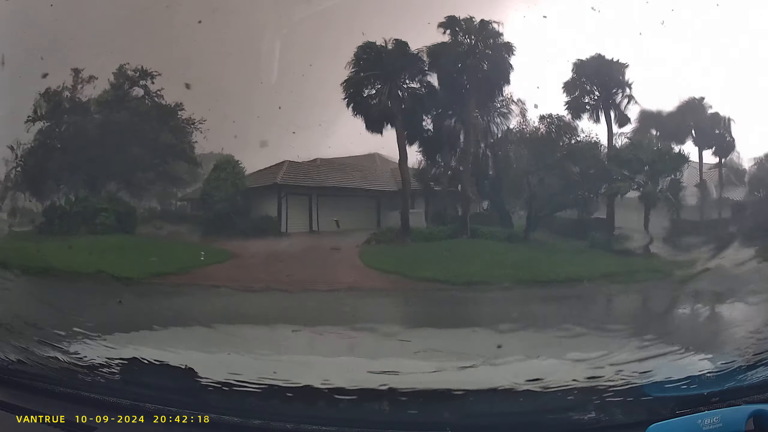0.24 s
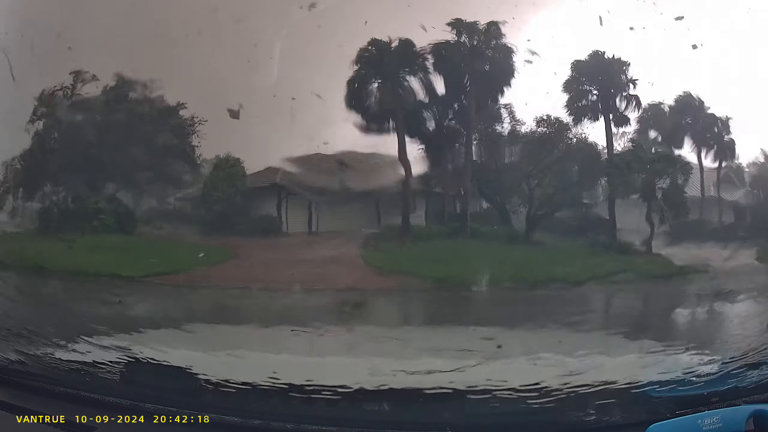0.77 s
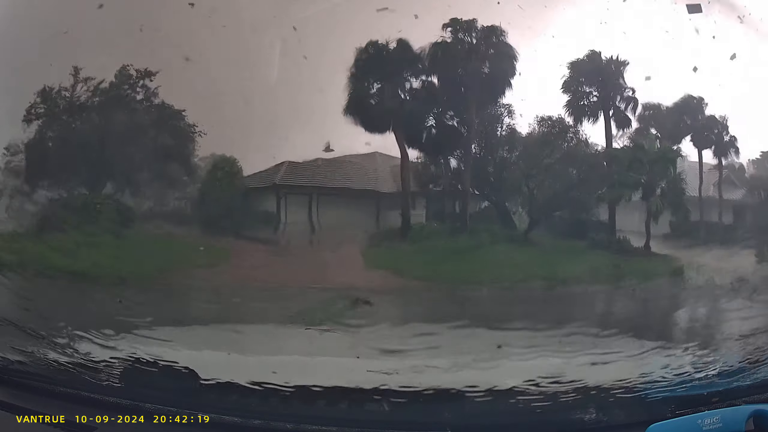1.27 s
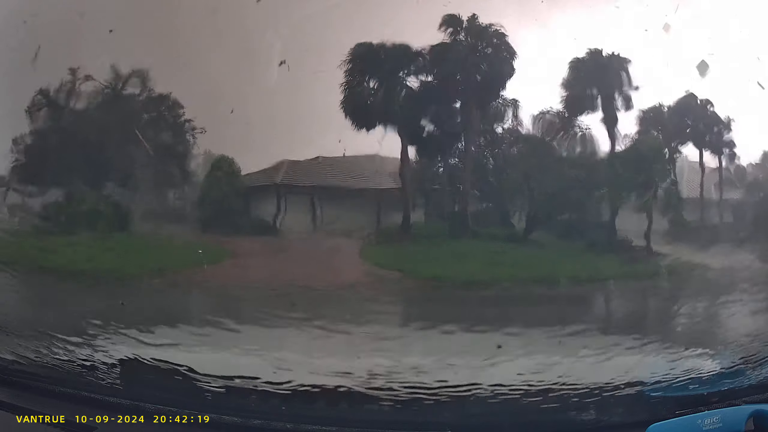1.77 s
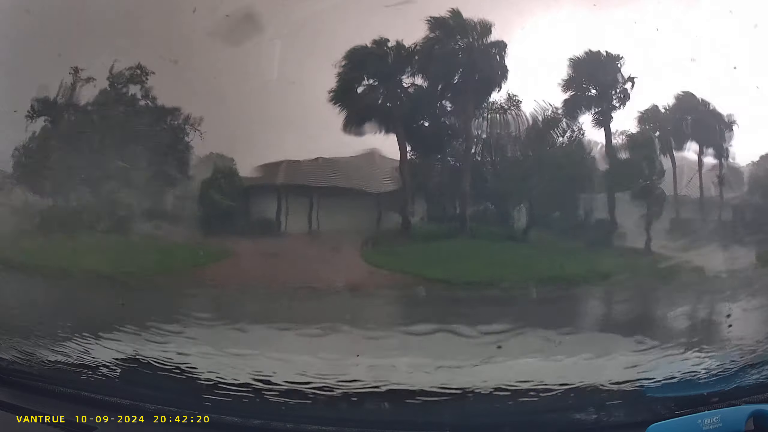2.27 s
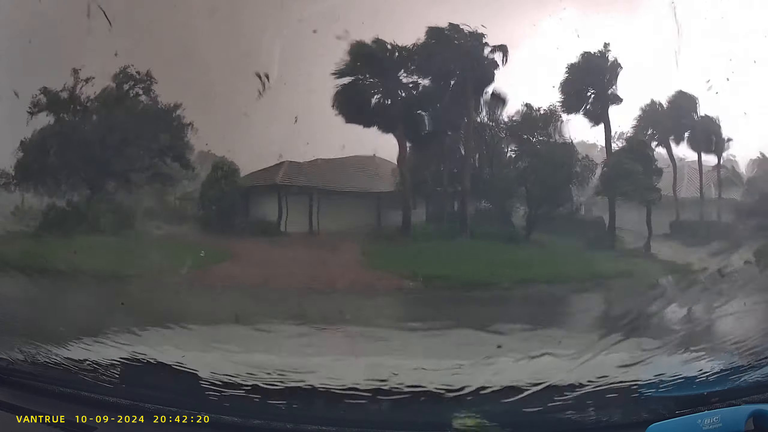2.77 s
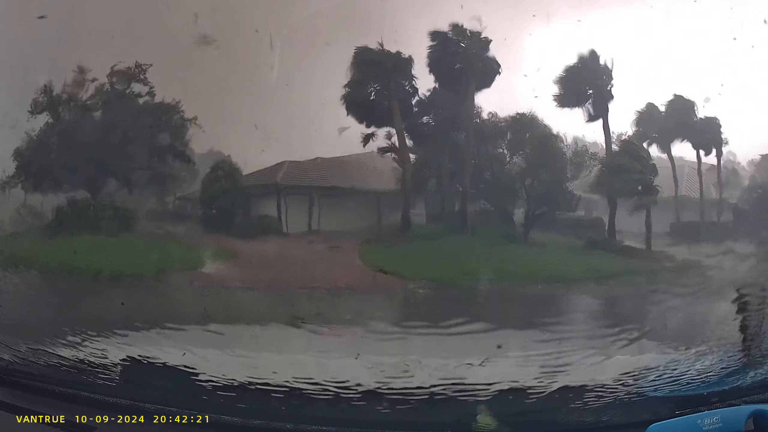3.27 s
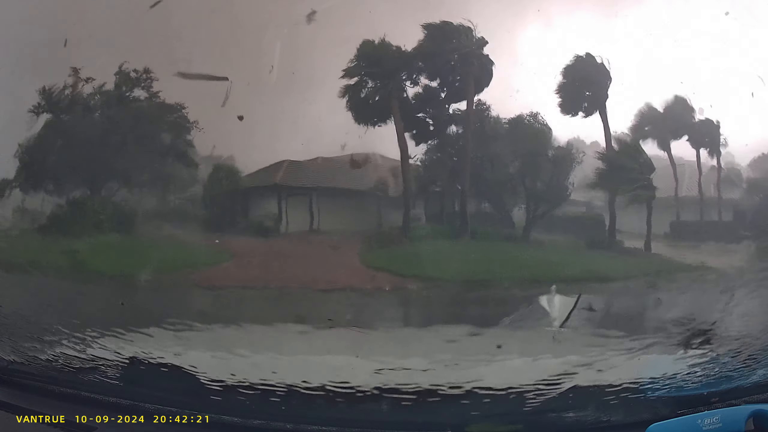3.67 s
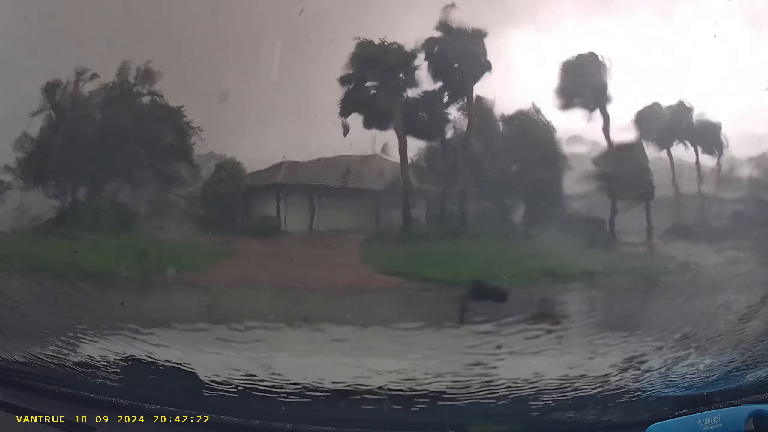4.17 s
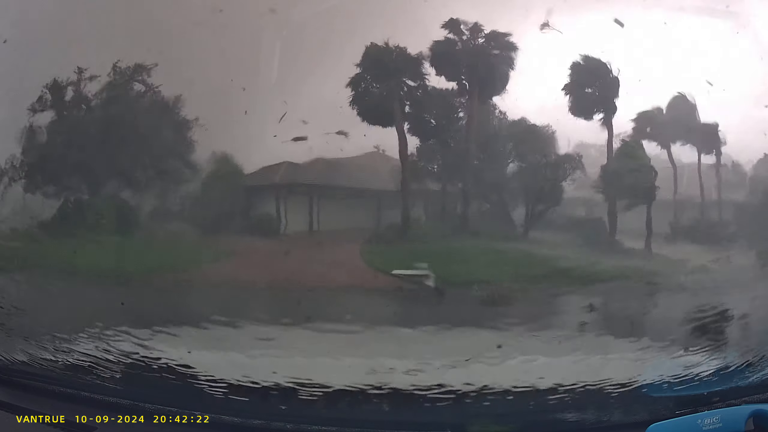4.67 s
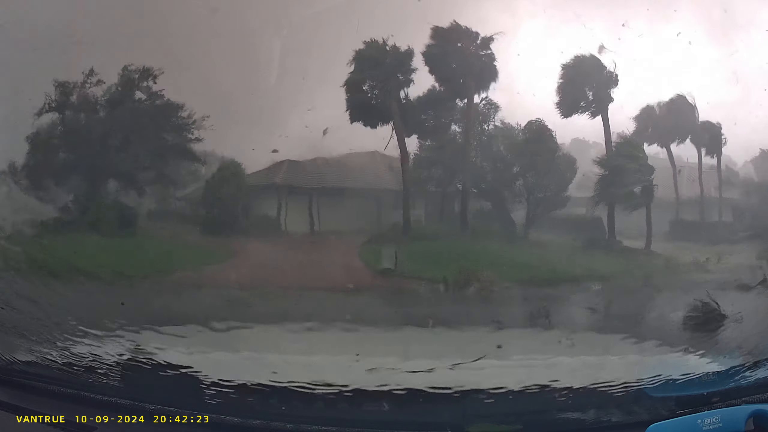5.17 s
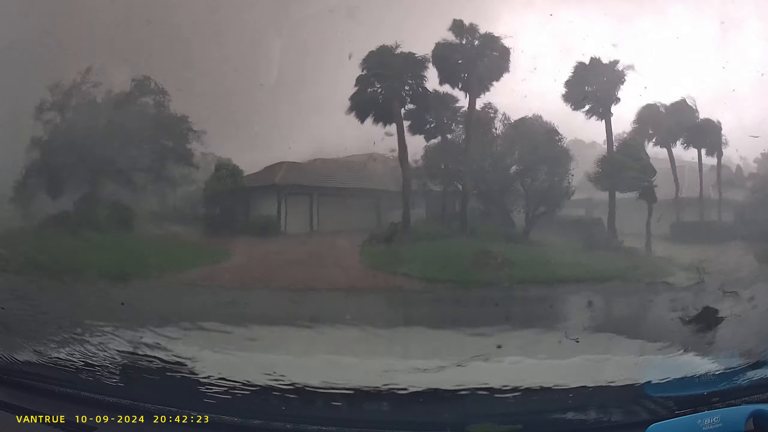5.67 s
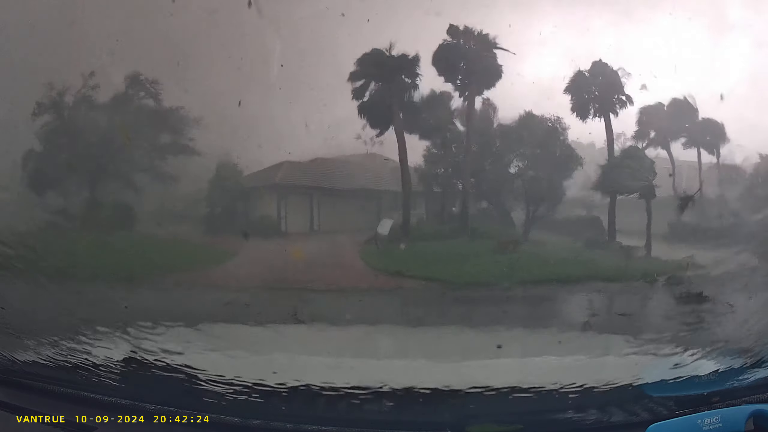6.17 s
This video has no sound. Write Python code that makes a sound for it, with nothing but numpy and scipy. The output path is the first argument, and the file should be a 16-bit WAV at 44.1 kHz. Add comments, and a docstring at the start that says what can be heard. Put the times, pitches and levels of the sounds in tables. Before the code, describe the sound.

Inside a parked car in a tornado, one channel, close and boxy. Low wind roar and sub-bass shaking run throughout, with faint rain hiss, patter and fine spray. For the first second it is relatively quiet: small ticks, a sharper click at 0.76, a water sheet at 0.8 and a dull knock at 0.95. From 1.2 heavy debris bangs the body panels; wind surges at 1.4, and hits crowd from 1.8 to 2.5 with big thuds, a gust and a sheet drumming on the roof. At 2.74 comes the loudest, hard glassy crack. A leafy rasp drags over paint at 3.0-3.25. Knocks resume at 3.5, bright clicks cluster at 3.8-4.6, with a thump at 4.14. Then sparser ticks, a solid knock at 5.2, lighter ones after, a gust at 5.7, and a click at 5.95 as rain and deeper roar swell near 6.0, easing slightly by 6.4.

```python
"""Tornado wind buffets a parked car and roars round it, heard from the cabin: drifting coloured noise.
Rain adds noise for sheets on the roof, random taps on the glass and a whisper of fine spray.
Short noise bursts make sharp clicks: grit and twigs, and a few overload ticks of the microphone.
Heavy debris rings the panels as decaying sines with bursts; a frond rasps by stick and slip.
All pass through shell resonances, and a fast limiter holds down the hardest blows."""
import sys
import numpy as np
from scipy import signal
from scipy.io import wavfile
from scipy.ndimage import uniform_filter1d, minimum_filter1d

SR = 44100
rng = np.random.default_rng(int(sys.argv[2]) if len(sys.argv) > 2 else 0)


def int16_out(signal):
    """Quantize to a 16-bit WAV file."""
    q = np.round(np.clip(np.atleast_2d(signal).T, -1, 1) * 32767)
    wavfile.write(sys.argv[1], SR, q.astype(np.int16))


N = 283563  # samples

# Spectral shapes before the shell resonances: f/Hz, relative density/dB
# dull colour of a struck or scraped body panel
BODY_SPECTRUM = [(50, -49.5), (140, 3), (240, 5), (380, 6), (580, -3.5), (850, -12.5), (2000, -50),
                 (5000, -73.5)]
# clack in the knocks and the sharp clicks
CLACK_SPECTRUM = [(150, -51.5), (450, 5), (750, 7), (1150, 2.5), (1500, -3), (2100, -13.5), (4000, -33),
                  (10000, -75.5)]
# sizzle of fine spray and of the sharp clicks
SIZZLE_SPECTRUM = [(2500, -30.5), (6500, 6.5), (9000, -3.5), (11000, -10.5), (13500, -17.5), (16000, -34)]
# sheets of water flung on the roof: start t/s, length/s, crest level/dB
WATER_SHEETS = [(0.81, 0.25, -35), (1.61, 0.15, -33), (2.12, 0.38, -28.5), (2.56, 0.15, -35.5),
                (3.85, 0.17, -32.5), (5.3, 0.35, -39.5), (5.98, 0.25, -39.5)]


def amp(db):
    """Level to gain: 20 dB is a factor of ten in amplitude."""
    return 10 ** (np.asarray(db) / 20)


def evened(x):
    """Normalization to unit rms, so that a later gain alone sets the level."""
    return x / np.sqrt(np.mean(x ** 2) + 1e-20)


def add(mix, s, sound):
    """Linear superposition of a sound on the mix, starting at s seconds."""
    part = mix[round(s * SR):][:len(sound)]
    part += sound[:len(part)]


def colour_db(spectrum, hz):
    """Transmission through a resonant shell: each mode lifts or lowers the source spectrum near its centre."""
    # resonances of panels and cabin: f/Hz, width/Hz, lift/dB
    shell_modes = [(127, 79, 2.5), (328, 70, 3), (544, 21, 3.5), (814.4, 28, 6), (1080, 290, 4.5),
                   (1960, 580, 5.5), (3060, 150, 0), (3670, 140, -3), (4150, 260, 2), (5000, 150, 1),
                   (6270, 1070, -8.5), (8330, 640, -6)]
    f, db = np.transpose(spectrum)
    source_db = np.interp(np.log(hz + 1), np.log(f), db)
    lifts = sum(lift / (1 + (2 * (hz - centre) / width) ** 2) for centre, width, lift in shell_modes)
    return source_db + lifts


def response(spectrum, size=4096):
    """Minimum-phase impulse response: the Hilbert transform of log gain gives the causal phase."""
    log_gain = np.log(amp(colour_db(spectrum, abs(np.fft.fftfreq(size, 1 / SR)))))
    causal_spectrum = np.exp(np.conj(signal.hilbert(log_gain)))
    return np.fft.ifft(causal_spectrum).real[:size // 2]


def turbulence(spectrum, patchy_db, flutter_db):
    """Turbulent noise: level patches (rms dB) drift over time and frequency; all bands share a flutter."""
    hz = np.fft.rfftfreq(2048, 1 / SR)
    real, imag, patches = rng.standard_normal((3, N // 512 + 5, len(hz)))
    patches = uniform_filter1d(patches, size=7, axis=0)  # over frames of 512 samples
    patches = evened(uniform_filter1d(patches, size=18, axis=1))  # over frequency bins
    frames = (real + 1j * imag) * amp(colour_db(spectrum, hz) + patchy_db * patches)
    noise = signal.istft(frames.T, nperseg=2048, noverlap=1536)[1][:N]
    flutter = uniform_filter1d(rng.standard_normal(N), size=900)
    flutter = evened(uniform_filter1d(flutter, size=400))
    return evened(noise * amp(flutter_db * flutter))


def burst(colour, t60, rise, tail_db, tail_t60, grain=0.):
    """Diffuse impulse: noise swells, decays exponentially and leaves a faint longer tail; times in s."""
    t = np.arange(SR // 2) / SR
    decay = amp(-60 * t / t60) + amp(tail_db - 60 * t / tail_t60)
    shape = (1 - np.exp(-t / rise)) * decay
    # the burst chatters: its level jumps by about `grain` dB every 64 samples
    chatter = np.repeat(rng.standard_normal(len(t)), 64)[:len(t)]
    source = rng.standard_normal(len(t)) * shape * amp(grain * chatter)
    sound = signal.fftconvolve(source, colour)[:len(t)]
    return sound / np.sqrt(np.sum(sound ** 2) / (0.014 * SR))  # energy of 14 ms at unit rms


def weather():
    """Slow forcing: wind and rain strength in dB, interpolated to every sample."""
    # strength of the storm: t/s, wind level/dB, rain level/dB
    storm = [(0.0, -35, -62), (1.25, -36, -61), (1.4, -23, -55.5), (1.66, -32, -59.5), (1.88, -27, -61.5),
             (2.11, -23.5, -51), (2.31, -30, -48), (2.74, -34, -62.5), (3.01, -31, -66), (3.17, -26.5, -57),
             (3.74, -32, -51.5), (4.05, -26, -52), (4.19, -30.5, -55), (5.68, -30, -54.5),
             (6.0, -25.5, -47), (6.43, -26, -57)]
    times, wind_db, rain_db = np.transpose(storm)
    t = np.arange(N) / SR
    return np.interp(t, times, wind_db), np.interp(t, times, rain_db)


def blown(db, growth):
    """Power-law growth with wind: level db at the usual wind, plus growth dB per dB of wind."""
    usual_wind_db = -30
    wind_db, _ = weather()
    return amp(db + growth * (wind_db - usual_wind_db))


def surges(rows):
    """Transient forcing: the gain of each gust or sheet swells to a crest and eases off."""
    t, gain = np.arange(N) / SR, np.zeros(N)
    crest = 0.32  # share of the length
    for s, length, db in rows:
        swell = np.interp((t - s) / length, [0, crest, 1], [0, 1, 0])
        gain += amp(db) * np.sin(np.pi / 2 * swell)
    return gain


def wind():
    """Turbulent pressure shakes and roars round the car; gusts add power to shaking, water sheets to roar."""
    # low shaking: f/Hz, relative density/dB
    buffet_spectrum = [(10, -14), (25, -16), (45, 2.5), (85, 9.5), (120, -32.5), (200, -35.5), (500, -66)]
    # broader roar: f/Hz, relative density/dB
    roar_spectrum = [(40, -12.5), (90, -14.5), (135, 1), (200, 2), (330, -3.5), (450, -8.5), (650, -30),
                     (1500, -62), (4000, -96)]
    # gusts that rock the car: start t/s, length/s, crest level/dB
    gusts = [(0.55, 0.53, -37.5), (1.88, 0.94, -28), (3.38, 0.18, -29.5), (3.65, 0.49, -35),
             (4.45, 0.27, -32), (5.69, 0.2, -27), (5.88, 0.43, -38)]
    sheet_roar_db = 8  # the roof booms under each sheet
    shaking = np.hypot(blown(-41, growth=0.29), surges(gusts))
    roaring = np.hypot(blown(-29.5, growth=0.93), amp(sheet_roar_db) * surges(WATER_SHEETS))
    buffet = shaking * turbulence(buffet_spectrum, patchy_db=1.8, flutter_db=0.2)
    roar = roaring * turbulence(roar_spectrum, patchy_db=2.32, flutter_db=0.7)

    # the roar deepens as the storm closes in: the tilt raises its bass and lowers the rest
    crossover_hz, start_tilt_db, tilt_db_per_s = 200, -1.5, 0.6
    deep = signal.sosfiltfilt(signal.butter(2, crossover_hz, fs=SR, output="sos"), roar)
    tilt = amp(start_tilt_db + tilt_db_per_s * np.arange(N) / SR)
    return buffet + deep * tilt + (roar - deep) / tilt


def rain():
    """Many impacts merge into noise: sheets drum on the roof, random single drops patter through a hiss."""
    # drumming on the roof: f/Hz, relative density/dB
    spray_spectrum = [(150, -25), (380, -5), (600, 8.5), (800, -3), (1150, -3), (1500, -14.5), (2100, -21),
                      (4000, -29.5), (9000, -77.5)]
    # hiss and taps on the glass: f/Hz, relative density/dB
    hiss_spectrum = [(500, -22.5), (1400, 4), (2200, -4), (3200, 2.5), (4600, -0.5), (5600, -7),
                     (7500, -13), (9500, -20), (13000, -25), (16000, -25)]
    drops_per_s, spread_db, drops_db = 320, 3.5, -1.5  # drops_db: patter relative to hiss
    drumming = np.hypot(blown(-41.5, growth=0.73), surges(WATER_SHEETS))
    spray = drumming * turbulence(spray_spectrum, patchy_db=2.1, flutter_db=2.5)
    hiss = turbulence(hiss_spectrum, patchy_db=4.5, flutter_db=6.0)

    sizes = amp(spread_db * np.minimum(rng.exponential(1, N), 4)) * rng.choice([-1, 1], N)
    impacts = sizes * (rng.random(N) < drops_per_s / SR)
    spot = rng.integers(0, 8, N)
    colour, patter = response(hiss_spectrum), np.zeros(N)
    for k in range(8):  # each spot on the glass has its own tap
        tap = burst(colour, t60=0.18, rise=0.0003, tail_db=-29, tail_t60=0.12)
        patter += signal.oaconvolve(impacts * (spot == k), tap)[:N]
    _, rain_db = weather()
    return spray + amp(rain_db) * (hiss + amp(drops_db) * evened(patter))


def fizz():
    """Tiny impacts of fine spray fuse into a high whisper on the windscreen, growing with the rain."""
    usual_rain_db, usual_db, growth = -52.5, -71, 0.8  # growth in dB per dB of rain
    _, rain_db = weather()
    gain = amp(usual_db + growth * (rain_db - usual_rain_db))
    return gain * turbulence(SIZZLE_SPECTRUM, patchy_db=2.5, flutter_db=1.5)


def clicks():
    """A short impulse is broadband: grit, twigs and a few overload ticks, each with its own snap resonance."""
    # sharp clicks: grit and twigs, and a few overload ticks of the microphone:
    # t/s, relative snap/dB, snap f/Hz, relative clack/dB, relative sizzle/dB, nominal t60/s
    sharp_clicks = [(0.102, -46.5, 2900, -49, -67, 0.12), (0.4467, -45, 3060, -34, -75, 0.14),
                    (0.5062, -36, 3330, -21.5, -60, 0.11), (0.755, -41, 3000, -31, -52, 0.15),
                    (0.7628, -18, 2950, -13, -32, 0.11), (0.83, -29.5, 5460, -19, -44, 0.16),
                    (1.3671, -29, 2680, -15, -70, 0.12), (1.4628, -21, 2680, -15.5, -45.5, 0.13),
                    (1.8623, -33, 2390, -15, -48.5, 0.027), (1.9331, -18, 3740, -10, -37, 0.066),
                    (2.104, -38.5, 3300, -41, -53, 0.087), (2.241, -23, 2370, -10.5, -43, 0.092),
                    (2.4327, -27, 4150, -17.5, -50, 0.089), (2.621, -18.5, 2700, -18.5, -47, 0.095),
                    (2.693, -38, 3350, -22.5, -66, 0.076), (2.7392, 0, 3030, -5.5, -22, 0.084),
                    (2.8734, -48, 2440, -26, -73, 0.028), (3.4047, -38, 4460, -21.5, -75, 0.11),
                    (3.455, -28.5, 4400, -39, -36.5, 0.13), (3.4843, -21.5, 4850, -9.5, -40, 0.077),
                    (3.6601, -39, 3250, -19.5, -80, 0.27), (3.8204, -11.5, 4580, -13, -34.5, 0.098),
                    (3.862, -17, 3250, -16, -33.5, 0.13), (3.938, -26.5, 2630, -22, -54, 0.15),
                    (3.9712, -21.5, 3160, -20, -50, 0.13), (4.016, -24.5, 2640, -23.5, -57, 0.1),
                    (4.109, -37, 3100, -19.5, -73, 0.11), (4.127, -16.5, 3800, -19, -34.5, 0.14),
                    (4.179, -30, 3320, -15.5, -36, 0.12), (4.359, -35, 4330, -28.5, -49.5, 0.14),
                    (4.4397, -23, 2750, -26, -44.5, 0.14), (4.499, -21, 2930, -22, -44.5, 0.22),
                    (4.5591, -30, 3400, -29, -43.5, 0.16), (4.601, -34.5, 4270, -38, -65, 0.098),
                    (4.781, -32, 3080, -28.5, -61, 0.12), (4.9627, -39, 4430, -20.5, -52, 0.051),
                    (5.017, -22, 4330, -47, -35, 0.095), (5.0468, -23.5, 2980, -27, -46, 0.14),
                    (5.3337, -35.5, 2940, -23, -67, 0.041), (5.835, -52, 4400, -46, -50.5, 0.26),
                    (5.9514, -17.5, 2960, -22.5, -41.5, 0.13), (6.035, -30.5, 2920, -26, -74, 0.16),
                    (6.175, -37.5, 4590, -34, -54, 0.24), (6.4164, -34.5, 4760, -34, -50, 0.12)]
    # glassy snap: f/Hz, relative density/dB
    glass_spectrum = [(500, -16), (1400, -5.5), (2500, 2), (3500, 3), (5000, 3.5), (7000, -7), (9000, -28),
                      (15000, -47)]
    width_hz, snap, rise, usual_t60 = 500, 1.57, 0.0016, 0.16  # snap: gain of the resonance; times in s
    out = np.zeros(N)
    glass, clack, sizzle = map(response, (glass_spectrum, CLACK_SPECTRUM, SIZZLE_SPECTRUM))
    for s, snap_db, hz, clack_db, sizzle_db, t60 in sharp_clicks:
        onset = rise * (t60 / usual_t60) ** 2  # clicks that die fastest also start fastest
        resonator = signal.iirpeak(hz, hz / width_hz, fs=SR)
        tuned = glass + snap * signal.lfilter(*resonator, glass)
        click = amp(snap_db - 8.5) * burst(
            tuned, t60 * 0.93, onset, tail_db=-22.5, tail_t60=0.17, grain=0.84)
        click += amp(clack_db - 10) * burst(
            clack, t60 * 1.12, onset, tail_db=-29, tail_t60=0.2, grain=3.2)
        click += amp(sizzle_db - 1) * burst(
            sizzle, t60 * 0.77, onset * 0.72, tail_db=-31.5, tail_t60=0.2, grain=2.2)
        add(out, s, click)
    return out


def panel_ring(hz, t60, rise):
    """Damped modal vibration: a struck panel mode swells, then dies exponentially; times in s."""
    t = np.arange(SR // 2) / SR
    ring = (1 - np.exp(-t / rise)) * amp(-60 * t / t60) * np.sin(2 * np.pi * hz * t)
    return ring / np.sqrt(np.sum(ring ** 2) / (0.017 * SR))  # energy of 17 ms at unit rms


def knocks():
    """Modal impact: weight drives low mode and body, hardness high mode and clack; some crack or thud."""
    # debris on the body: t/s, relative weight/dB, hardness/dB, crack/dB, thud/dB,
    # low ring f/Hz, high ring f/Hz, nominal t60/s
    debris_hits = [(0.949, -9, -28, -55, -30, 148, 577, 0.067), (1.208, 1, -10, -28.5, -18, 187, 550, 0.16),
                   (1.302, -7, -17.5, -38, -34, 139, 545, 0.13),
                   (1.367, -30, -11, -44, -46, 288, 1114, 0.14),
                   (1.411, -6.5, -18.5, -30, -20, 229, 593, 0.19),
                   (1.509, -7.5, -29, -36, -35, 312.2, 535, 0.47),
                   (1.828, 3, -9.5, -29.5, -26, 305, 465, 0.077),
                   (1.863, -3, -19, -36, -29, 339, 486, 0.099),
                   (1.972, -2, -16, -31.5, -11, 329, 567, 0.091), (2.1, -5, -29, -43, -24, 320, 544, 0.076),
                   (2.221, -2.5, -11, -21, -0.5, 146, 605, 0.046),
                   (2.313, -3, -21, -41, -9, 116, 534, 0.17),
                   (2.326, -5.5, -16.5, -28.5, -34, 152, 564, 0.13),
                   (2.381, -2.5, -30, -46, -11, 370, 533, 0.17),
                   (2.517, -3, -16, -34.5, -4, 325, 645, 0.081),
                   (2.531, -7, -28.5, -39, -17, 116, 586, 0.094),
                   (2.738, 1, -15, -14, -24, 386, 1040, 0.085),
                   (2.969, -6, -31, -45, -22.5, 289, 413, 0.24),
                   (3.226, -10.5, -29, -41, -22, 209, 1080, 0.15),
                   (3.475, -6.5, -16.5, -44, -28, 174, 1110, 0.093),
                   (3.516, -1, -17.5, -30, -11, 140, 614, 0.13),
                   (3.814, -12, -21, -21.5, -42, 165, 1048, 0.066),
                   (4.142, -4.5, -12, -29, -9, 161, 526, 0.1),
                   (4.712, -16, -15, -33.5, -33, 203, 679, 0.16),
                   (5.208, -6.5, -13.5, -22, -15.5, 200, 1080, 0.16),
                   (5.382, -14, -33.5, -32.5, -29, 178.5, 703, 0.17),
                   (5.676, -19, -24, -30, -42, 142, 974, 0.29)]
    # thud of big debris: f/Hz, relative density/dB
    thud_spectrum = [(20, -19), (50, -16), (100, -5.5), (160, -6.5), (230, 0.5), (450, -17.5),
                     (1500, -72.5)]
    # crack of brittle debris: f/Hz, relative density/dB
    crack_spectrum = [(500, 5), (1400, -3.5), (2100, 0), (3500, 6.5), (5000, -6.5), (7500, -12.5),
                      (11000, -29.5), (16000, -52)]
    out = np.zeros(N)
    spectra = (thud_spectrum, BODY_SPECTRUM, CLACK_SPECTRUM, crack_spectrum)
    thud, body, clack, crack = map(response, spectra)
    heave = amp(-13) * panel_ring(74.5, t60=0.06, rise=0.008)  # a thud heaves the whole shell
    for s, weight_db, hardness_db, crack_db, thud_db, low_hz, high_hz, t60 in debris_hits:
        heavy = amp(-10.5) * panel_ring(low_hz, t60 * 0.65, rise=0.0046)
        heavy += amp(-11) * burst(body, t60 * 1.3, rise=0.0062, tail_db=-27.5, tail_t60=0.48)
        hard = amp(-4.5) * panel_ring(high_hz, t60 * 0.78, rise=0.0061)
        hard += amp(-4.5) * burst(
            clack, t60 * 0.77, rise=0.0087, tail_db=-38, tail_t60=0.12, grain=1.4)
        brittle = amp(-5.5) * burst(
            crack, t60 * 0.55, rise=0.01, tail_db=-34.5, tail_t60=0.22, grain=2.5)
        cabin = heave + amp(-9) * burst(
            thud, t60 * 1.9, rise=0.00091, tail_db=-27, tail_t60=0.48)
        knock = amp(weight_db) * heavy + amp(hardness_db) * hard
        knock += amp(crack_db) * brittle + amp(thud_db) * cabin
        add(out, s, knock)
    return out


def frond():
    """Stick-slip friction: leaves catch, ease into a drag and let go in a dense, uneven rasp on the paint."""
    # catches and drags on the body: start t/s, relative level/dB, time to release/s
    strokes = [(2.993, -29.5, 0.16), (3.16, -33.5, 0.059), (3.216, -43, 0.047)]
    # rasp of leaves on paint: f/Hz, relative density/dB
    scrape_spectrum = [(200, -18.5), (600, 9.5), (1300, 10.5), (2000, 2), (4200, -1), (6000, -11.5),
                       (12000, -50)]
    catch_s, ease_s, release_s, drag_db, slips_per_s = 0.0093, 0.018, 0.021, -9, 2500
    pressure = np.zeros(N)
    for s, db, length in strokes:
        t = np.maximum(np.arange(N) / SR - s, 0)
        onset = np.minimum(t / catch_s, 1)
        catch = np.exp(-np.maximum(t - catch_s, 0) / ease_s) + amp(drag_db)
        release = np.exp(-np.maximum(t - length, 0) / release_s)
        pressure += amp(db) * onset * catch * release
    slips = rng.standard_normal(N) * (rng.random(N) < slips_per_s / SR)
    rasp = evened(signal.oaconvolve(slips, response(scrape_spectrum))[:N])
    panel = evened(signal.oaconvolve(slips, response(BODY_SPECTRUM))[:N])
    return pressure * (rasp + amp(10.5) * panel)


def scene():
    """Superposition of all the sounds in the cabin, as one channel."""
    return (wind() + rain() + fizz() + clicks() + knocks() + frond())[None]


def record(dry):
    """Microphone self-noise, peak limiting by instant hold and linear dB recovery, then a band limit."""
    # patchy, fluttering faint hiss of the microphone: f/Hz, relative density/dB
    self_noise = [(1000, 4), (8000, -3), (16000, -5)]
    ceiling_db, recovery_db_per_s, edge_hz = -2.0, 300, 16000
    heard = dry + amp(-72.5) * turbulence(self_noise, patchy_db=3.5, flutter_db=3.5)
    over_db = np.maximum(20 * np.log10(abs(heard[0]) + 1e-9) - ceiling_db, 0)
    fall = np.arange(N) * recovery_db_per_s / SR
    held_db = np.maximum.accumulate(over_db + fall) - fall
    # a centred window lets the gain fall smoothly just ahead of each peak
    gain_db = uniform_filter1d(minimum_filter1d(-held_db, size=41), size=41)
    low_pass = signal.firwin(511, edge_hz, window=("kaiser", 9), fs=SR)
    return signal.oaconvolve(heard * amp(gain_db), low_pass[None], "same")


dry = scene()
out = record(dry)
int16_out(out)
```